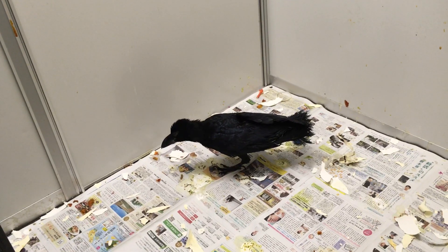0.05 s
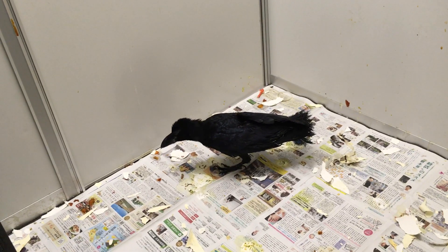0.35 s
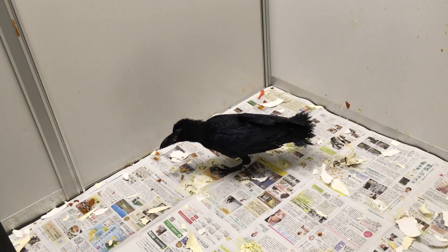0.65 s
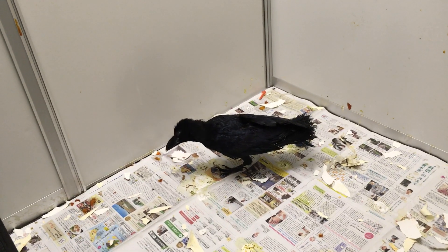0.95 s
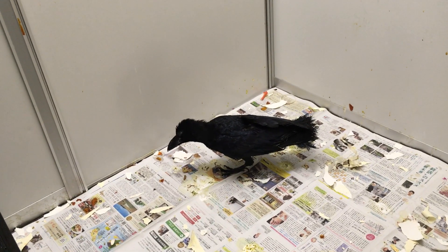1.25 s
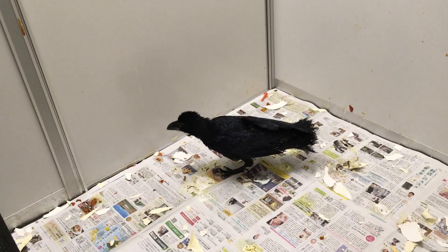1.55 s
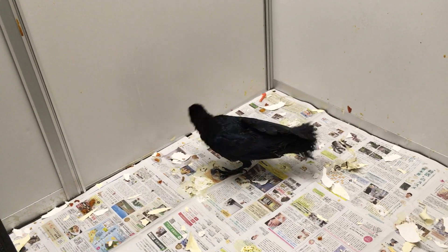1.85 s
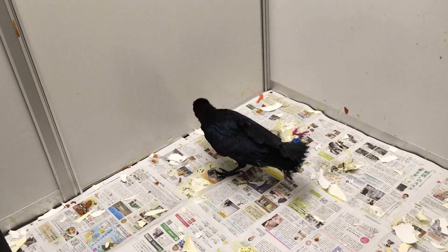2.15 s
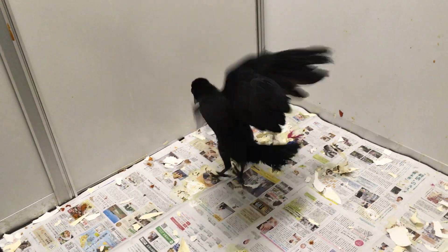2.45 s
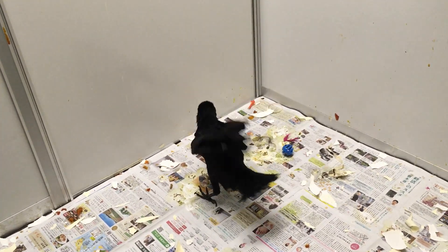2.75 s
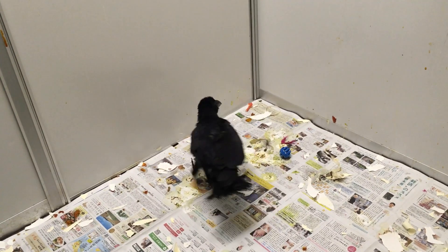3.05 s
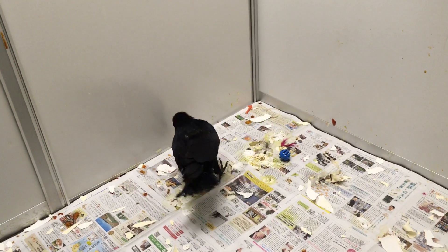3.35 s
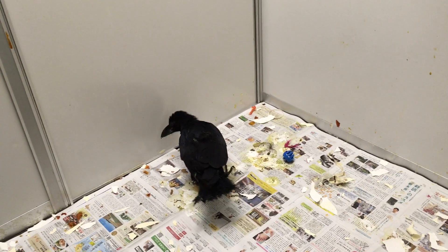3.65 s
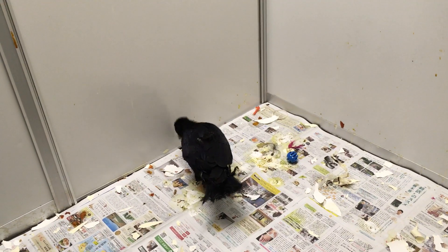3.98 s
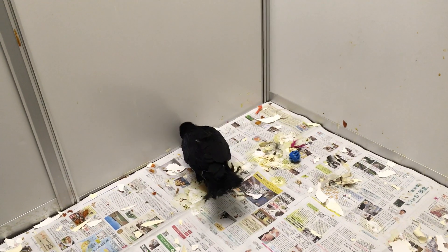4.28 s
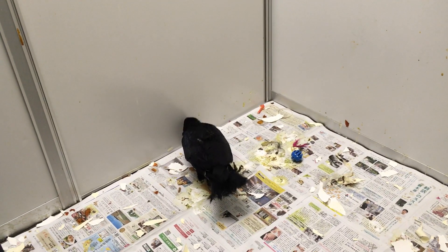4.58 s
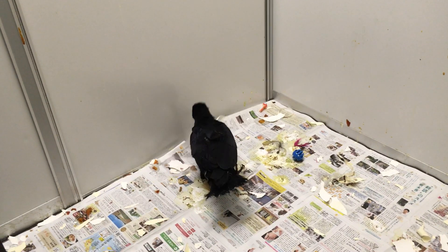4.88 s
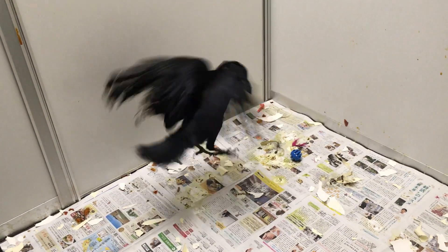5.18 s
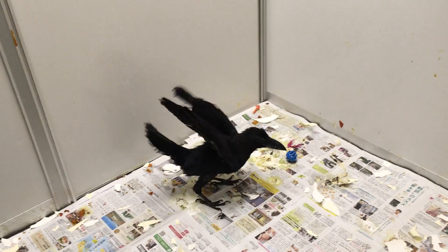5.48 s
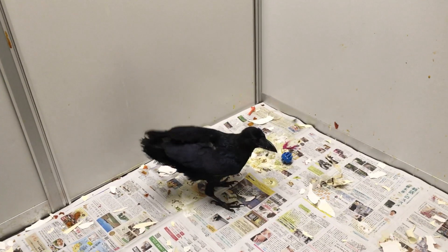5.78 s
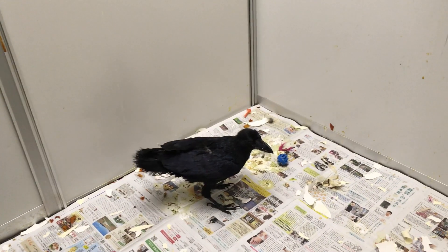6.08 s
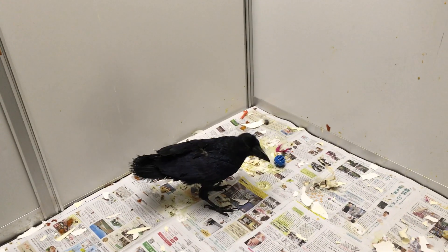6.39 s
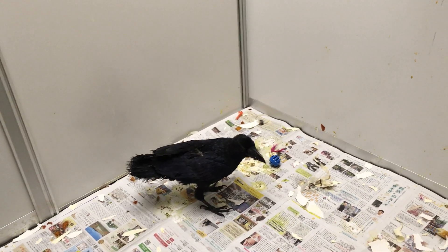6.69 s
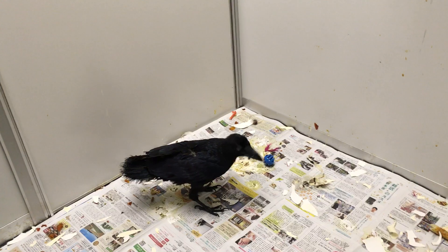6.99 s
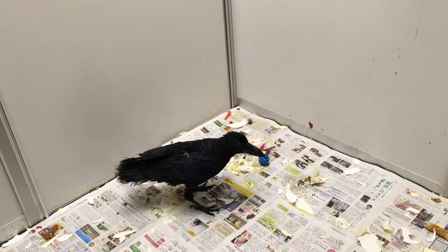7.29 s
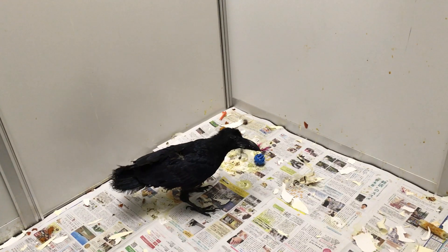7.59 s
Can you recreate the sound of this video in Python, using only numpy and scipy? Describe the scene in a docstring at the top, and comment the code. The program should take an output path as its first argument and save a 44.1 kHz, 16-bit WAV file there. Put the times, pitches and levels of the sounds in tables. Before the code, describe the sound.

Ventilation hums steadily in a small enclosure with hard walls. A crow flaps and lands on newspaper with a sharp, crunchy slap, then shuffles with clicking, scraping claws. Its beak strikes a thin wall panel, which gives a low boom. The bird leaps with a loud rustle of feathers and lands on the paper again. Everything sounds close, with a short echo.

```python
"""In a small enclosure with hard walls, a crow moves about on newspaper while ventilation hums.
Its feet crush the paper and slap the floor, its claws click and scrape, and its feathers rustle
as they slide over wall and paper. It hops with a flap, shuffles, pecks the wall so that the thin
panel booms, then leaps with a long rustle and lands again. The close walls add a short echo."""
import sys
import numpy as np
from scipy import signal
from scipy.fft import rfft, irfft
from scipy.io import wavfile
from scipy.ndimage import uniform_filter1d

SR = 44100
rng = np.random.default_rng(int(sys.argv[2]) if len(sys.argv) > 2 else 0)


def generate_wav(signal):
    """Clip the signal to [-1, 1] and save it as 16-bit WAV at the path in sys.argv[1]."""
    frames = np.transpose(np.atleast_2d(signal))
    scaled = np.clip(frames, -1, 1) * 32767
    pcm = np.round(scaled).astype(np.int16)
    wavfile.write(sys.argv[1], SR, pcm)


N = 340960
TIME = np.arange(N) / SR

# sweeps of a wing or the tail: t/s, level/dB, brightness/(dB per octave), swell/s, hold/s, fade/(dB per s)
SWEEPS = [(2.137, -65.5, -2, 0.055, .11, 149), (2.329, -51, -0.5, 0.036, 0.024, 147.5),
          (2.41, -59.5, 1, 0.029, 0.29, 54), (3.256, -64.5, -2.5, 0.048, .12, 130),
          (4.226, -51, -5, 0.0038, .005, 192), (4.234, -62.5, 0, 0.018, 0.021, 141),
          (4.645, -47.5, 1, .018, .012, 149), (4.698, -60, -4.5, 0.012, 0.016, 70),
          (4.847, -32.5, 0.26, 0.045, 0.045, 151), (4.905, -34, 0.35, 0.04, 0.036, 172),
          (4.996, -37.5, 0, 0.016, 0.0082, 401.5), (5.065, -42, -0.83, 0.031, 0.12, 180),
          (5.283, -60, -0.5, 0.055, 0.57, 78)]


def gain_of(db):
    """Turns decibels into a number to multiply by."""
    return 10 ** (np.asarray(db) / 20)


def unit_rms(x):
    """Scales a sound to an average strength (rms) of 1."""
    return x / np.sqrt(np.mean(x ** 2) + 1e-20)


def hit(x, db, reference_s=.01):
    """Gives a short sound the energy of a burst of level db that lasts reference_s."""
    return gain_of(db) * unit_rms(x) * np.sqrt(reference_s * SR / len(x))


def look_up(points, hz):
    """Reads between the rows of a frequency table, on a scale of octaves."""
    f, value = np.transpose(points)
    return np.interp(np.log(hz + 1), np.log(abs(f) + 1), value)


def octaves(hz):
    """Octaves above 5000 Hz, the middle of the rustle; all below 500 Hz counts as 500 Hz."""
    return np.log2(np.maximum(hz, 500) / 5000)


def coloured(x, spectrum, tilt=0):
    """Gives x a tone colour, brightened by tilt dB per octave, at an rms of 1."""
    hz = np.fft.rfftfreq(len(x), 1 / SR)
    gain = gain_of(look_up(spectrum, hz) + tilt * octaves(hz))
    return unit_rms(irfft(rfft(x) * gain, len(x)))


def add(mix, s, sound):
    """Mixes a sound in, starting at s seconds."""
    part = mix[round(s * SR):][:len(sound)]
    part += sound[:len(part)]


def crackle(size, per_s, spread_db):
    """Tiny slips at random times, most of them small and a few large."""
    chance = rng.random(size)
    height = np.minimum(rng.exponential(1, size), 4)
    sign = rng.choice([-1., 1.], size)
    return unit_rms(sign * gain_of(spread_db * height) * (chance < per_s / SR))


def burst(t, length, rise):
    """A loudness curve that rises quickly and dies away; times in seconds."""
    return (1 - np.exp(-t / rise)) * np.exp(-t / length)


def band_noise(size, hz, q):
    """Noise around one pitch; a higher q makes the pitch clearer."""
    b, a = signal.iirpeak(hz, q, fs=SR)
    return unit_rms(signal.lfilter(b, a, rng.standard_normal(size)))


def ring(tones, t):
    """A struck thing's tones, each falling 60 dB in its ring time; the spot hit gives random signs."""
    return sum(rng.choice([-1, 1]) * gain_of(db - 60 * t / ring_s) * np.sin(2 * np.pi * hz * t)
               for hz, db, ring_s in tones)


def ventilation(duct_db=-62):
    """Air rumbles and hisses in a duct and a fan hums unsteadily, over a soft background noise."""
    duct_colour = [(22, -19), (38, 2), (52, 1.5), (66, -3.5), (85, -20), (115, -6.5), (145, -16.5),
                   (190, -12), (250, -14.5), (310, -22), (370, -18), (470, -23.5), (1000, -25.5),
                   (1600, -30.5), (2500, -34.5), (4900, -41.5), (6200, -39.5), (10500, -40.5), (12500, -37),
                   (16000, -38.5)]  # spectrum of the duct noise: f/Hz, level/dB
    fan_tones = [(118.8, -65), (171, -76.5), (360.5, -81)]  # hum of the fan: f/Hz, level/dB
    # a faraway rush ends near 0.9 s; then faint background noise drifts a little: t/s, level/dB
    background_levels = [(0, -69), (.4, -69.5), (.8, -70.5), (.95, -79), (1.8, -80), (3, -77), (7.7, -82)]
    background_colour = [(100, -11), (350, 1.5), (900, 1.5), (1500, -1), (2300, -19.5), (4000, -28),
                         (12000, -49.5)]  # spectrum of the rush and the faint noise: f/Hz, level/dB
    air = gain_of(duct_db) * coloured(rng.standard_normal(N), duct_colour)
    for hz, db in fan_tones:
        waver = np.interp(TIME, np.linspace(0, TIME[-1], 60), rng.standard_normal(60))
        air += gain_of(db) * np.sqrt(2) * np.sin(2 * np.pi * hz * TIME + 0.12 * waver)
    background_gain = gain_of(np.interp(TIME, *np.transpose(background_levels)))
    return air + background_gain * coloured(rng.standard_normal(N), background_colour)


def wall_echo(x, build_s=0.0037, patterns=4):
    """Sound bounces between close, hard walls; the low notes last longest."""
    echo_times = [(100, .35), (500, 0.34), (1400, 0.28), (3500, 0.27), (9000, 0.19), (15000, 0.27)]  # time the echo takes to fall 60 dB: f/Hz, ring time/s
    t, out = TIME[:SR // 2], np.zeros(N)
    # the sound is handed round the echo patterns, about 110 rounds a second
    turn = np.cumsum(rng.random(N)) / 50
    for k in range(patterns):
        hz, age, bands = signal.stft(rng.standard_normal(len(t)), SR, nperseg=256)
        decay = gain_of(-60 * age / look_up(echo_times, hz)[:, None])
        tail = signal.istft(bands * decay, SR, nperseg=256)[1][:len(t)]
        tail *= 1 - np.exp(-(t / build_s) ** 2)
        share = np.sin(np.pi / 2 * np.minimum((turn - k) % patterns, 2))
        out += signal.oaconvolve(x * share, tail / np.linalg.norm(tail))[:N]
    return out


def standing_wave(x, hz=170, q=7, db=9):
    """The air between the walls swells at one low pitch."""
    return gain_of(db) * signal.lfilter(*signal.iirpeak(hz, q, fs=SR), x)


def panel_booms(rise_s=0.0037):
    """The thin wall panel swings after a blow and sounds its lowest tones."""
    blows = [(4.232, -29), (4.263, -27.5), (4.478, -50), (4.654, -39.5)]  # blows that shake the panel: t/s, level/dB
    panel_tones = [(54.4, -4, 0.57), (88, -1, 0.15), (118, 3.5, 0.2), (167, -4.5, 0.29),
                   (196.5, -5.5, 0.28), (237.4, -10.5, 0.38), (323, -14, 0.19), (376, -11.5, 0.13)]  # tones of the panel: f/Hz, level/dB, ring time/s
    out, t = np.zeros(N), TIME[:32768]
    for s, db in blows:
        add(out, s, hit(ring(panel_tones, t) * (1 - np.exp(-t / rise_s)), db))
    return out


def body_knocks():
    """Body and feet bump the enclosure dully; the longer a knock lasts, the clearer its pitch."""
    bumps = [(2.301, -39.5, 120.3, 0.043), (2.303, -41, 477, 0.034), (2.545, -49.5, 178, 0.064),
             (2.677, -56, 180, 0.02), (4.232, -48.5, 530, 0.008), (4.475, -56, 540, 0.0034),
             (4.652, -43, 500, 0.01), (5.459, -41, 687, 0.0085), (5.475, -47, 375, 0.0068),
             (5.813, -52, 660, 0.0059)]  # soft blows: t/s, level/dB, f/Hz, length/s
    out, t = np.zeros(N), TIME[:16384]
    for s, db, hz, length in bumps:
        thud = band_noise(len(t), hz, q=3 + 0.17 * hz * length) * burst(t, length, rise=0.0015)
        muffled = signal.lfilter(*signal.butter(4, 1.08 * hz, fs=SR), thud)
        add(out, s, hit(muffled, db))
    return out


def claw_clicks():
    """A claw tip or a paper crease rings for just an instant."""
    taps = [(0.2994, -68.5, 4500), (2.013, -76, 7000), (2.031, -73, 8500), (2.232, -56, 8000),
            (2.234, -50, 3160), (2.271, -56, 3000), (2.652, -47, 2500), (2.778, -62.5, 11100),
            (3.017, -61.5, 5260), (3.066, -53, 8000), (3.2137, -46.5, 6300), (3.4057, -45.5, 4280),
            (3.5316, -53, 5770), (3.791, -74, 7880), (4.058, -67, 4170), (4.295, -57, 9000),
            (4.753, -64, 3960), (4.7853, -53, 2300), (4.821, -60, 4000), (5.795, -61, 3000)]  # single clicks: t/s, level/dB, f/Hz
    out, t = np.zeros(N), TIME[:1024]
    for s, db, hz in taps:
        click = band_noise(len(t), hz, q=1.1) * burst(t, length=0.0019, rise=0.00011)
        add(out, s, hit(click, db))
    return out


def claw_scrapes():
    """A claw scrapes along the wall, rasping around one pitch."""
    drags = [(2.242, -53, 2890, 0.053), (2.542, -43, 2550, 0.045)]  # drags of a claw: t/s, level/dB, f/Hz, length/s
    out, t = np.zeros(N), TIME[:16384]
    for s, db, hz, length in drags:
        rasp = band_noise(len(t), hz, q=13) * burst(t, length, rise=0.0035)
        add(out, s, hit(rasp, db))
    return out


def beak_pecks(ring_db=1.0, clean_s=0.011):
    """The beak strikes the wall and skids: a short strike rings cleanly, a long skid rasps."""
    strikes = [(4.1963, -50, 0.00092), (4.1980, -45, 0.0018), (4.204, -42.5, 0.017), (4.228, -56, 0.0057)]  # beak on the wall: t/s, level/dB, skid length/s
    beak_bands = [(648, 18, -9), (1230, 360, -1), (2620, 90, 2), (3800, 250, -8.5), (6400, 270, -6.5),
                  (9200, 380, -8), (13150, 3500, -9)]  # pitches a peck sets ringing: f/Hz, width/Hz, level/dB
    # a narrower band rings longer
    tones = [(hz, db, np.log(1000) / np.pi / width) for hz, width, db in beak_bands]
    out, t = np.zeros(N), TIME[:8192]
    for s, db, length in strikes:
        skid = sum(gain_of(band_db) * band_noise(len(t), hz, q=hz / width)
                   for hz, width, band_db in beak_bands)
        add(out, s, hit(skid * burst(t, length, rise=.0002), db))
        add(out, s, hit(ring(tones, t), db + ring_db) * np.exp(-length / clean_s))
    return out


def floor_slap(length):
    """A foot slaps the floor under the paper with a dull puff of noise."""
    floor_colour = [(80, -15.5), (170, -11), (260, -20), (420, -6.5), (580, 2.5), (800, -6.5), (1030, 1),
                    (1450, -4), (1800, -15), (2700, -9), (8000, -32.5)]  # spectrum of the slap: f/Hz, level/dB
    t = TIME[:8192]
    return coloured(rng.standard_normal(len(t)), floor_colour) * burst(t, length, rise=.0012)


def paper_crush(length, tilt):
    """Crushed paper gives off a spray of tiny crackles."""
    paper_colour = [(90, -25.5), (165, -13.5), (270, -21), (500, -16), (1100, -12), (1800, -3.5),
                    (2550, -1.5), (3700, -2), (4900, -7.5), (6200, -5), (8500, -8), (10500, -10),
                    (13000, -12), (16000, -16)]  # spectrum of the newspaper: f/Hz, level/dB
    t = TIME[:8192]
    slips = crackle(len(t), per_s=11000, spread_db=2.2)
    return coloured(slips, paper_colour, tilt) * burst(t, length, rise=0.001)


def footsteps(toe_db=-10, toe_s=.009, slap_db=-16.5):
    """The toes brush the paper first; then the sole crushes it and slaps the floor beneath."""
    # feet on the paper: t/s, level/dB, length/s, brightness/(dB per octave), head start of the toes/s
    steps = [(1.948, -65.5, 0.068, 2, 0.012), (2.293, -27, 0.0066, -0.2, .006),
             (2.308, -31, 0.0099, -3, 0.019), (2.538, -33.5, 0.026, 3, 0.0065),
             (2.552, -39.5, 0.0064, -4, 0.0032), (2.671, -43.5, 0.0072, -1.5, 0.018),
             (2.692, -45.5, 0.0091, -0.5, 0.0074), (3.032, -55.5, 0.035, -2, .027),
             (3.06, -51.5, 0.023, -2, 0.00087), (3.183, -43.5, 0.041, -0.5, 0.0079),
             (3.349, -47, 0.029, 1, 0.009), (3.455, -56, 0.011, -0.5, 0.017),
             (3.495, -50, 0.036, -0.7, 0.0023), (3.6744, -61, 0.027, -5.5, 0.0028),
             (4.378, -45.5, 0.016, -1.5, 0.0045), (4.466, -59, 0.028, 4, 0.0043),
             (4.856, -33.5, 0.038, 1.5, .022), (4.887, -34.5, 0.011, 3, 0.014),
             (5.441, -32, 0.017, -1, 0.0081), (5.462, -33.5, .012, -.5, 0.015),
             (5.645, -60.5, .018, 6, 0.01), (5.7, -61, .015, -2, 0), (5.812, -48, 0.0075, -0.5, 0.019)]
    out = np.zeros(N)
    for s, db, length, tilt, lead in steps:
        add(out, s - lead, hit(paper_crush(toe_s, tilt), db + toe_db))
        add(out, s, hit(paper_crush(length, tilt), db))
        add(out, s, hit(floor_slap(length), db + slap_db))
    return out


def landings():
    """The bird's whole weight slaps the floor and leaves it ringing."""
    touchdowns = [(2.2939, -27.5, .009, -8.5), (4.6473, -53.5, 0.0045, -14), (5.46, -39, 0.0092, -13),
                  (5.815, -57, .008, -10)]  # heavy slaps: t/s, level/dB, length/s, ring compared with slap/dB
    floor_tones = [(465.9, -1, .32), (500, -7, 0.1), (603, -2, .12)]  # tones of the floor: f/Hz, level/dB, ring time/s
    out, t = np.zeros(N), TIME[:16384]
    for s, db, length, ring_db in touchdowns:
        add(out, s, hit(floor_slap(length), db))
        add(out, s, hit(ring(floor_tones, t), db + ring_db))
    return out


def sweep_strength(t, db, swell, hold, fade, sag_db_per_s=22):
    """One sweep of feathers swells, loses some force while it is held, then fades."""
    rise = np.sin(np.pi / 2 * np.clip(t / swell, 0, 1)) ** 2
    sag_db = sag_db_per_s * np.clip(t - swell, 0, hold)
    fade_db = fade * np.maximum(t - swell - hold, 0)
    return rise * gain_of(db - sag_db - fade_db)


def crease_snaps(per_s=130, level_db=-9, pitches=10):
    """Under the sweeping feathers, single quills and creases snap, each with its own pitch."""
    snaps, t = np.zeros(N), TIME[:256]
    for hz in np.geomspace(1800, 7000, pitches):
        snap = np.sin(2 * np.pi * hz * t) * np.exp(-t * hz / 3.1)
        slips = crackle(N, per_s / pitches, spread_db=3.5)
        snaps += unit_rms(signal.oaconvolve(slips, snap)[:N])
    sweep_power = np.zeros(N)
    for s, db, _, swell, hold, fade in SWEEPS:
        add(sweep_power, s, sweep_strength(TIME[:SR], db, swell, hold, fade) ** 2)
    return gain_of(level_db) * unit_rms(snaps) * np.sqrt(sweep_power)


def feather_rustle(clump_db=1.4):
    """Countless fine feather strands slip, in clumps as one feather after another catches."""
    feather_colour = [(59, -31.5), (100, -1), (140, -7.5), (193, 2), (442, -25), (492, -8.5), (910, -10.5),
                      (991, -5.5), (1760, -5.5), (4020, -5), (4870, -9.5), (6290, -4.5), (10500, -6),
                      (15000, -6.5), (16000, -13.5)]  # spectrum of sliding feathers: f/Hz, level/dB
    out, t = np.zeros(N), TIME[:SR]
    hz = np.fft.rfftfreq(len(t), 1 / SR)
    for s, db, tilt, swell, hold, fade in SWEEPS:
        strands = coloured(crackle(len(t), per_s=11000, spread_db=4.5), feather_colour)
        strands = irfft(rfft(strands) * gain_of(tilt * octaves(hz)), len(t))
        clumps = unit_rms(uniform_filter1d(rng.standard_normal(len(t)), size=180))
        add(out, s, strands * gain_of(clump_db * clumps) * sweep_strength(t, db, swell, hold, fade))
    return out


def scene():
    """The crow, the booming panel and the echo of the walls, over the ventilation."""
    feet = footsteps() + landings()
    ticks = claw_clicks() + crease_snaps()
    thuds = body_knocks()
    bird = feet + beak_pecks() + claw_scrapes() + feather_rustle()
    echo = wall_echo(gain_of(-1.8) * bird + gain_of(-1.5) * ticks + gain_of(-2.5) * thuds)
    return (bird + ticks + thuds + panel_booms() + echo + standing_wave(feet) + ventilation())[None]


def record(dry):
    """The microphone drops the deepest bass; then the highest treble is cut off."""
    low_hz, high_hz = 33, 16050
    thinned = signal.sosfilt(signal.butter(4, low_hz, "highpass", fs=SR, output="sos"), dry)
    treble_cut = signal.firwin(511, high_hz, window=("kaiser", 8), fs=SR)
    return signal.oaconvolve(thinned, treble_cut[None], "same")


dry = scene()
out = record(dry)
generate_wav(out)
```